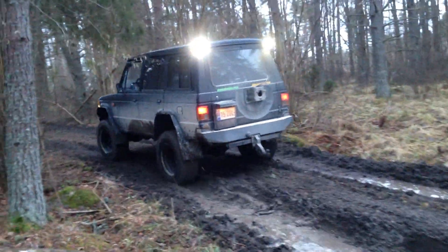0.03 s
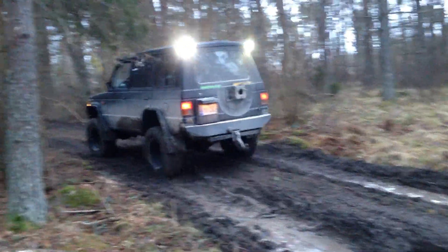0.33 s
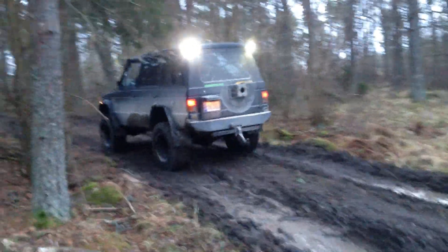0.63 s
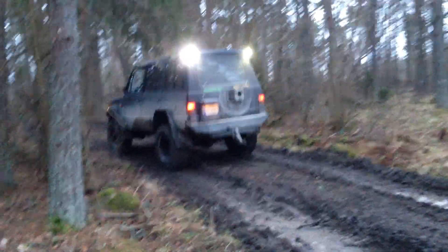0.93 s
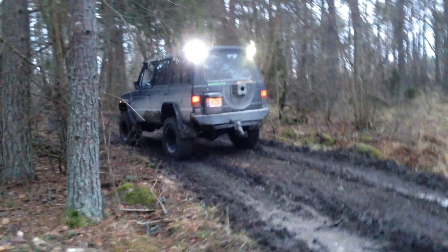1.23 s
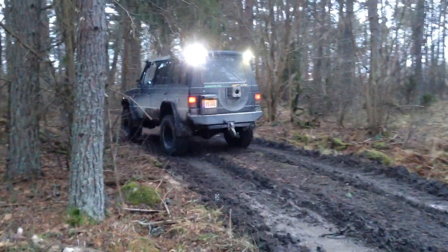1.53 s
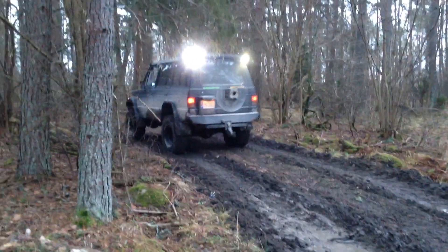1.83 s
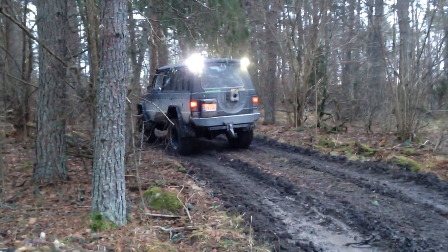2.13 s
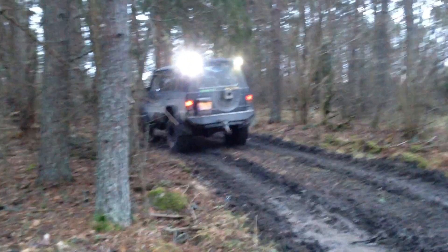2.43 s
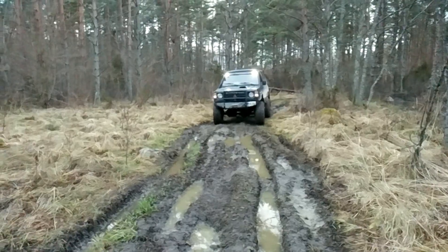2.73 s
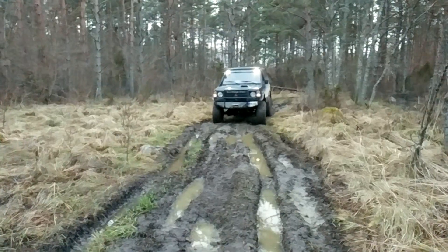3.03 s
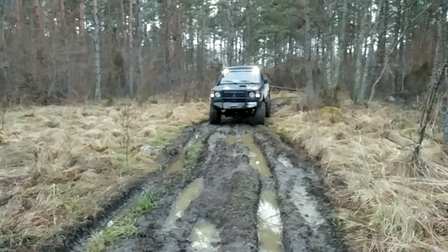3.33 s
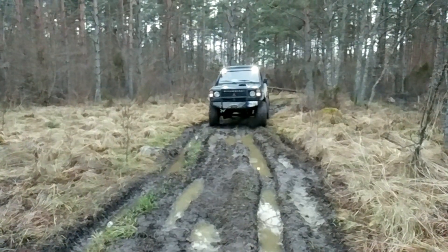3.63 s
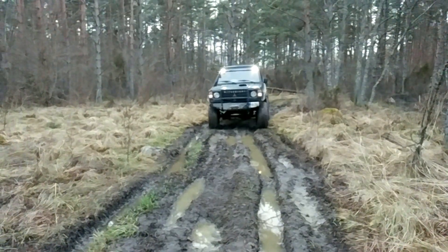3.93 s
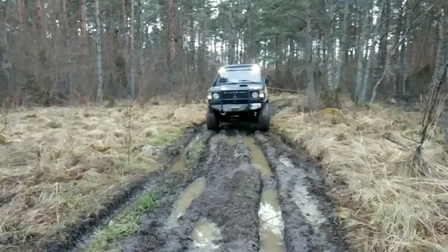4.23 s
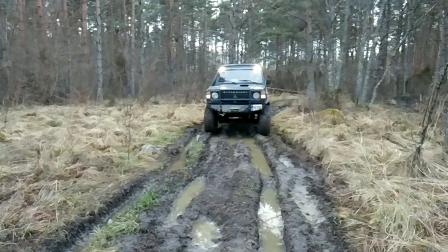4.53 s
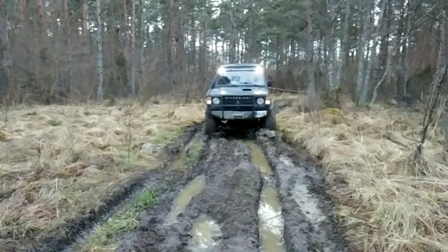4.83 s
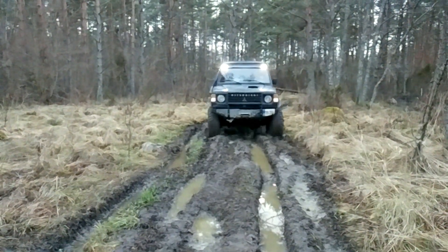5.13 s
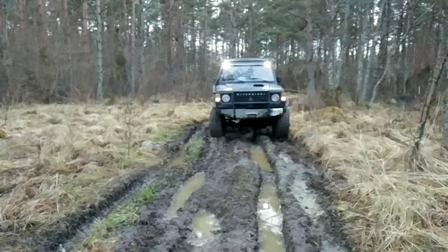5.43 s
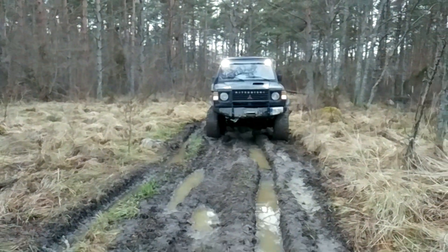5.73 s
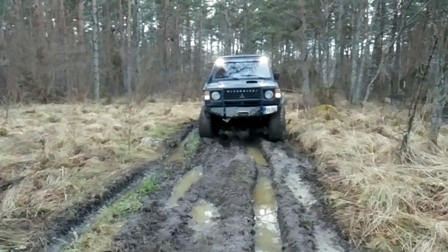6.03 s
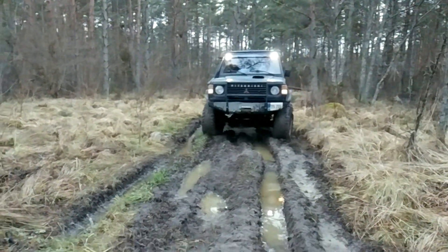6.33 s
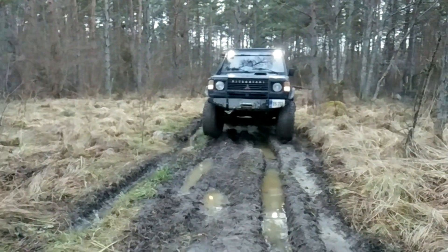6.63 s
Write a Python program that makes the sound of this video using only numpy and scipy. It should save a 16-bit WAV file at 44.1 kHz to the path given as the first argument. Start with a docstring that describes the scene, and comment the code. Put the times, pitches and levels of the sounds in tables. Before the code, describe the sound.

An off-road vehicle pulls away at walking pace a few metres from the microphone, its engine hum dropping and fading over wet mud and cracking twigs. After an abrupt, short silence, a diesel engine comes in from a distance and slowly approaches, its revs rising slightly, with a low exhaust drone, rhythmic clatter and intake hiss. Faint forest air lies behind both vehicles.

```python
"""A muddy forest track. Five metres from the microphone a four-wheel drive rolls away at walking pace,
its revs sinking while the tyres squelch, snap twigs and knock on stones. Half a second of silence follows.
Then a four-cylinder diesel fades in twenty metres off and crawls up to about twelve: the exhaust drones,
every firing knocks the block, the injectors tick and the intake hisses.
The trees scatter both cars a little, and faint distant air lies behind each."""
import sys
import numpy as np
from scipy import signal
from scipy.fft import rfft, irfft
from scipy.io import wavfile
from scipy.ndimage import uniform_filter1d

SR = 44100
rng = np.random.default_rng(int(sys.argv[2]) if len(sys.argv) > 2 else 0)


def generate_wav(sig):
    """Save sig (samples, or channels by samples) to the path in sys.argv[1] as 16-bit PCM at SR."""
    pcm = np.round(np.clip(np.atleast_2d(sig).T, -1, 1) * 32767).astype(np.int16)
    wavfile.write(sys.argv[1], SR, pcm)


N = 298998
T = np.arange(N) / SR
FREQS = np.maximum(np.fft.rfftfreq(8192, 1 / SR), 1)
LEAVE_END_S, DIESEL_START_S = 2.528, 3.055

# The leaving car's firing rate: t/s, f/Hz
LEAVE_FIRING_RATE = [(0.0, 78.8), (0.54, 73.6), (0.71, 70.43), (0.93, 63.08), (1.25, 57.6), (1.64, 55.27),
                     (2.19, 47.15), (2.5, 42.94)]
# its exhaust hum, a row per multiple of the firing rate: starting level/dB, rise/dB per octave of revs
LEAVE_HUM = [(-42.2, 18), (-48, 9), (-59, -7)]
# its gear tones: multiple of the firing rate, level/dB against the clatter
LEAVE_GEAR_TONES = [(2.25, -26), (2.5, -33), (2.75, -35.5), (5.5, -21.5), (7, -36), (10.25, -25.5),
                    (11, -25)]
# spectra of its exhaust pipe, its block and the mud: f/Hz, level/dB
LEAVE_PIPE_SPECTRUM = [(25, -22), (55, -3.5), (90, -6.5), (125, -5), (180, 2), (245, -3), (320, -14),
                       (500, -29.5)]
LEAVE_BLOCK_SPECTRUM = [(190, -50.5), (320, -29.5), (366, -5), (404, 1), (433, -1.5), (495, -2),
                        (592, -2.5), (721, -3), (1050, -3.5), (1360, -2.5), (1470, 0), (1810, -3.5),
                        (2010, 0), (2450, -8.5), (2700, -12), (3510, -30.5), (5940, -120)]
MUD_SPECTRUM = [(1470, -26.5), (2500, -7.5), (2800, -3), (3120, 2), (4170, 0.5), (5750, -4.5), (6640, -5.5),
                (13700, -16.5), (14700, -18), (15500, -20.5)]
# its ringing panels: f/Hz, width/Hz, boost/dB
LEAVE_PANEL_MODES = [(335, 40, 1.5), (411, 22, -1.5), (495.5, 21, 6.5), (733, 42, 6.5), (1600, 70, 3.5),
                     (2210, 60, 3.5)]
# a tyre churns through a wetter patch: t/s, length/s, swell/dB
WET_PATCHES = [(0.86, 0.1, 3), (1.14, 0.12, 3.5), (1.42, 0.11, 2), (2.32, 0.14, 3)]
# twigs, then stones and roots, under the tyres: t/s, peak level/dB, f/Hz
TWIG_SNAPS = [(0.0144, -16.5, 3300), (0.0274, -30.5, 4650), (0.0377, -34.5, 4030), (0.172, -27.5, 4000),
              (0.2069, -26.5, 4100), (0.5227, -30, 3390), (0.5432, -27.5, 3590), (0.6301, -27, 4120),
              (0.6873, -26, 3370), (0.8061, -35, 3680), (0.8754, -27, 4290), (0.9549, -22.5, 4580),
              (1.1114, -30, 3710), (1.1469, -29, 3713), (1.5542, -33, 3040)]
STONE_KNOCKS = [(0.178, -25, 1410), (0.476, -28.5, 1490), (0.773, -27, 1480)]

# The diesel's firing rate: t/s, f/Hz
DIESEL_FIRING_RATE = [(3.06, 42.3), (3.55, 44.84), (3.77, 47.14), (4.22, 47.41), (4.52, 49.75),
                      (4.69, 51.22), (5.04, 53.5), (5.17, 52.69), (5.6, 52.76), (5.85, 51.97),
                      (6.25, 52.06), (6.78, 53.9)]
# its exhaust hum, a row per multiple of the firing rate: starting level/dB, rise/dB per octave of revs
DIESEL_HUM = [(-55.5, 25), (-34, -6.5), (-41.5, 2.5)]
# its tones: multiple of the firing rate, level/dB against the clatter
DIESEL_TONES = [(3.5, -28), (3.75, -30.5), (4, -27.5), (4.25, -34.5), (7, -30.5), (9, -30.5), (10, -28),
                (11, -28), (14, -31), (15, -33), (16, -30), (18, -31)]
# spectra of its exhaust pipe, block, injectors and intake: f/Hz, level/dB
DIESEL_PIPE_SPECTRUM = [(25, -27), (45, -25), (65, -4.5), (110, -2.5), (160, -1), (215, 4), (260, -1.5),
                        (320, -0.5), (420, -17), (700, -44)]
DIESEL_BLOCK_SPECTRUM = [(290, -20), (355, -3.5), (420, -5.5), (520, -4.5), (565, -7.5), (660, -4.5),
                         (760, -1), (940, -2.5), (1030, -8.5), (1220, -6.5), (1430, -14), (1620, -10.5),
                         (1760, -17.5), (1950, -12), (2200, -29)]
INJECTOR_SPECTRUM = [(1240, -41), (2100, -15), (2230, -8.5), (2690, -1), (3140, 0), (3770, -3.5),
                     (4400, -11.5), (5000, -8.5), (6500, -23), (11000, -120)]
INTAKE_SPECTRUM = [(2710, -33), (4600, -16), (5410, -10), (6740, 0), (7130, 1), (7620, -3), (8350, -16),
                   (9060, -27.5), (11700, -17.5), (12800, -20.5), (14000, -26), (15500, -22.5)]
# its ringing panels: f/Hz, width/Hz, boost/dB
DIESEL_PANEL_MODES = [(374.2, 13, 6), (476.5, 16, 2.5), (751, 40, 3), (834, 16, 2), (1553, 78, 3.5)]
# its tappet and mounts: place in the cycle/firings, f/Hz, Q, level/dB against the knock
LOOSE_PARTS = [(1.57, 1607, 10, -16.5), (1.75, 361, 14, -18), (3.75, 370, 5.4, -19)]
# it pulls harder over a rut: t/s, length/s, hiss swell/dB, knock swell/dB, hum swell/dB
RUT_PULLS = [(3.35, 0.14, 1, 1.8, 1), (4.76, 0.23, 1.7, 0.7, 0.3), (5.25, 0.28, 3.5, -0.1, 0.3),
             (6.38, 0.2, 1.2, 2.0, 0.3), (6.6, 0.16, 0.3, 0.6, 3)]

# Each cylinder's firing, in both engines: level/dB
CYLINDER_DB = [0.34, 0.55, -1, -0.11]
# distant air in the trees: f/Hz, level/dB
AIR_SPECTRUM = [(20, -5), (50, -3.5), (120, 0), (300, -13), (1000, -15.5), (4000, -20.5), (12000, -37.5)]


def coming_diesel(from_m=19.7, speed_m_s=2.08):
    """The diesel crawls towards the microphone; knock, tick and hiss all pulse with its firings."""
    hz, octaves, firings = revs(DIESEL_FIRING_RATE)
    driven_m = speed_m_s * np.maximum(T - DIESEL_START_S, 0)
    nearness = from_m / (from_m - driven_m)
    pull_hiss_db, pull_knock_db, pull_hum_db = swells(RUT_PULLS)
    tones = whine(firings, DIESEL_TONES, waver_db=2.5)

    hum_db = hum_levels(hz, DIESEL_HUM, silencer_hz=157, width_hz=6.4, boom_db=3)
    hum = exhaust_hum(firings, hum_db, waver_db=0.75) * undb(pull_hum_db)
    pulses = clatter(firings, jitter_ms=0.27, valves_db=10, rattle_db=-0.5, ring_s=0.024)
    rumble = colour(pulses + tones, DIESEL_PIPE_SPECTRUM) * undb(-36.5 - 12.5 * octaves)

    works = clatter(firings, jitter_ms=0.1, valves_db=9, rattle_db=3.5, ring_s=0.1)
    knock = colour(works + tones, DIESEL_BLOCK_SPECTRUM, DIESEL_PANEL_MODES) + taps(firings)
    knock = grille(knock, driven_m) * undb(-31.5 + 7.5 * octaves + pull_knock_db)

    tick = colour(puffs(firings, peak_at=0.39, steady=2.2, scatter_db=3.5), INJECTOR_SPECTRUM)
    tick *= undb(-44 + 10 * octaves + 0.7 * pull_hiss_db)
    hiss = colour(puffs(firings, peak_at=0.26, steady=1, scatter_db=1.75), INTAKE_SPECTRUM)
    hiss *= undb(-41.5 + 12.5 * octaves + pull_hiss_db)
    return nearness * (hum + rumble + knock + tick + hiss)


def leaving_car(from_m=4.96, speed_m_s=1.8):
    """The car starts close to the microphone and rolls off through mud and twigs as its revs sink."""
    hz, octaves, firings = revs(LEAVE_FIRING_RATE)
    nearness = from_m / (from_m + speed_m_s * T)
    tones = whine(firings, LEAVE_GEAR_TONES, waver_db=3)
    squelch = wet_clicks(per_s=700, spread_db=3.5)

    hum_db = hum_levels(hz, LEAVE_HUM, silencer_hz=170, width_hz=16, boom_db=12.5)
    hum = exhaust_hum(firings, hum_db, waver_db=1.25)
    pulses = clatter(firings, jitter_ms=0.16, valves_db=14.5, rattle_db=-0.5, ring_s=0.05)
    rumble = colour(pulses + tones, LEAVE_PIPE_SPECTRUM) * undb(-49.5 + 2.5 * octaves)

    works = clatter(firings, jitter_ms=0.12, valves_db=7, rattle_db=1.5, ring_s=0.073)
    block = colour(works + tones + 0.37 * squelch, LEAVE_BLOCK_SPECTRUM, LEAVE_PANEL_MODES)
    block *= undb(-41.5 + 7 * octaves)

    mud = tyre_mud(squelch) * undb(-41 + 9.5 * octaves)
    debris = cracks(TWIG_SNAPS, t60=0.02, q=1.9) + cracks(STONE_KNOCKS, t60=0.028, q=1.8)
    return nearness * (hum + rumble + block + mud) + debris


def revs(table):
    """An engine's firing rate in Hz, its octaves above the starting rate, and the firings so far."""
    hz = np.interp(T, *np.transpose(table))
    return hz, np.log2(hz / hz[0]), np.cumsum(hz) / SR


def exhaust_hum(firings, levels_db, waver_db):
    """The lowest multiples of the firing rate, as the silencer lets them out."""
    return sum(tone(db + waver_db * walk(22), k * firings + rng.random())
               for k, db in enumerate(levels_db, 1))


def hum_levels(hz, orders, silencer_hz, width_hz, boom_db):
    """Each multiple's level in dB follows the revs and booms in the silencer's resonance."""
    return [db + per_octave * np.log2(hz / hz[0]) + resonance_db(k * hz, silencer_hz, width_hz, boom_db)
            for k, (db, per_octave) in enumerate(orders, 1)]


def clatter(firings, jitter_ms, valves_db, rattle_db, ring_s, count=24):
    """Combustion knocks with valves and gears striking between them, in the same pattern every cycle."""
    knocks = strikes(firings, np.arange(4), undb(CYLINDER_DB), jitter_ms, scatter_db=0)
    places = 4 * (np.arange(count) + rng.random(count)) / count
    valves = strikes(firings, places, rng.choice([-1, 1], count), jitter_ms, scatter_db=2)
    blows = knocks + undb(valves_db) * valves
    return unit(unit(blows) + undb(rattle_db) * rattle(blows, ring_s))


def strikes(firings, places, sizes, jitter_ms, scatter_db):
    """Blows at set places in the four-firing cycle, each a little off in time and strength."""
    cycle_starts = 4 * np.arange(int(firings[-1] / 4) + 1)
    points = (cycle_starts[:, None] + places).ravel()
    timing, strength = rng.standard_normal((len(points), 2)).T
    at = (np.interp(points, firings, T, right=-1) + jitter_ms * timing / 1000) * SR
    size = np.resize(sizes, len(points)) * undb(scatter_db * strength)
    inside = (at > 0) & (at < N - 1)
    return unit(np.bincount(at[inside].astype(int), size[inside], N))


def rattle(blows, t60):
    """Each blow shakes many loose parts: a fresh burst of noise that dies away."""
    decay = np.exp(-2 * np.log(1000) / (t60 * SR))
    energy = signal.lfilter([1], [1, -decay], blows ** 2 + 1e-12)
    return unit(np.sqrt(energy) * rng.standard_normal(N))


def grille(knock, driven_m, db_per_m=0.88):
    """The grille beams the middle of the knock forwards as it comes to face the microphone."""
    facing_db = -4.5 + db_per_m * driven_m
    beamed = knock + (undb(facing_db) - 1) * band(knock, hz=770, q=2.2)
    return beamed / undb(0.25 * facing_db)


def puffs(firings, peak_at, steady, scatter_db):
    """Noise that swells after each firing, peaks at the given share of the period and sinks again."""
    k = firings.astype(int)
    phase = firings % 1 / peak_at
    size = undb(np.take(CYLINDER_DB, k, mode="wrap") + scatter_db * rng.standard_normal(k[-1] + 1)[k])
    return unit(rng.standard_normal(N) * (steady + size * phase * np.exp(1 - phase)))


def taps(firings, ring_s=0.025):
    """A loose tappet and the mounts knock at their own points of the cycle, each with its own pitch."""
    out = 0
    for place, hz, q, db in LOOSE_PARTS:
        blows = strikes(firings, np.array([place]), [1], jitter_ms=0.27, scatter_db=0.5)
        ring = band(blows + 0.29 * rattle(blows, ring_s), hz, q)
        out += undb(db) * unit(band(ring, hz, q=2.1))
    return out


def whine(firings, tones, waver_db, slip_cycles=0.075):
    """Tones locked to the engine, unsteady in strength and phase, on average waver_db below their level."""
    return sum(tone(db + waver_db * (walk(9) - 1), k * firings + slip_cycles * walk(12))
               for k, db in tones)


def tyre_mud(squelch):
    """Mud sticks to the tyres and tears loose, louder in the wetter patches."""
    churn_db, = swells(WET_PATCHES)
    tearing = 0.52 * squelch + 0.59 * rattle(squelch, t60=0.011) + 0.87 * rng.standard_normal(N)
    return colour(tearing, MUD_SPECTRUM) * undb(churn_db + 0.6 * walk(28))


def wet_clicks(per_s, spread_db):
    """Tiny clicks in the mud, most faint and a few strong."""
    hit = rng.random(N) < per_s / SR
    clicks = hit * rng.uniform(-1, 1, N)
    return unit(clicks * undb(spread_db * np.minimum(rng.exponential(size=N), 3.5)))


def cracks(table, t60, q):
    """A tyre meets a twig, stone or root: a sharp crack and a short ring."""
    out, t = np.zeros(N), T[:SR // 16]
    for s, db, hz in table:
        burst = 0.31 * rng.standard_normal(len(t)) * np.exp(-np.log(1000) * t / t60)
        burst[0] += 3.5
        crack = band(band(burst, hz, q), hz, q / 2)
        out[int(s * SR):][:len(t)] += undb(db) * crack / np.abs(crack).max()
    return out


def forest(x, wet_db=-16, t60=0.63):
    """Trunks scatter a faint, short echo back to the microphone; the long waves pass around them."""
    t = T[:SR // 2]
    echoes = rng.standard_normal(len(t)) * np.exp(-np.log(1000) * t / t60)
    scattered = signal.oaconvolve(band(x, hz=2600, q=0.45), echoes / np.linalg.norm(echoes))[:N]
    return x + undb(wet_db) * scattered


def distant_air(level_db=-66):
    """Air in the trees far from the track: a low, steady rush."""
    return undb(level_db) * colour(rng.standard_normal(N), AIR_SPECTRUM)


def colour(x, spectrum, peaks=()):
    """Causal filter from (f/Hz, level/dB) points and (f/Hz, width/Hz, boost/dB) resonances; rms 1 out."""
    hz, db = np.transpose(spectrum)
    db = np.interp(np.log(FREQS), np.log(hz), db)
    octaves_outside = np.maximum(np.log2(hz[0] / FREQS), 0) + np.maximum(np.log2(FREQS / hz[-1]), 0)
    db -= np.minimum(40 * octaves_outside, 60)
    db += sum(resonance_db(FREQS, *peak) for peak in peaks)
    # folding the cepstrum gives minimum phase
    cepstrum = irfft(np.log(undb(db)))
    cepstrum[1:len(FREQS) - 1] *= 2
    cepstrum[len(FREQS):] = 0
    impulse = irfft(np.exp(rfft(cepstrum)))
    return unit(signal.oaconvolve(x, impulse)[:N])


def resonance_db(hz, centre_hz, width_hz, boost_db):
    """The bell-shaped boost of one resonance."""
    return boost_db / (1 + (2 * (hz - centre_hz) / width_hz) ** 2)


def band(x, hz, q):
    """Two-pole resonance, gain 1 at the centre."""
    return signal.lfilter(*signal.iirpeak(hz, q, fs=SR), x)


def tone(db, cycles):
    """A sine at the given rms level."""
    return np.sqrt(2) * undb(db) * np.sin(2 * np.pi * cycles)


def swells(table):
    """A smooth rise and fall for each (t/s, length/s, swell/dB, ..) row; one curve per dB column."""
    return sum(np.outer(db, np.exp(-(2 * (T - s) / length) ** 2)) for s, length, *db in table)


def walk(rate_hz):
    """Smooth random drift, rms 1."""
    hold = int(SR / rate_hz)
    steps = np.repeat(rng.standard_normal(N // hold + 1), hold)
    return unit(uniform_filter1d(steps, hold)[:N])


def undb(db):
    """Decibels to gain."""
    return 10 ** (np.asarray(db) / 20)


def unit(x):
    """Scale to rms 1."""
    return x / np.sqrt(np.mean(x ** 2))


def scene(fade_in_s=0.27, fade_from_db=-19.5):
    """One microphone by the track: a car leaves, a silent pause, then the diesel fades in."""
    cut_off = uniform_filter1d(1. * (T < LEAVE_END_S), size=128)
    fade_in = np.interp(T, [DIESEL_START_S, DIESEL_START_S + fade_in_s], [undb(fade_from_db), 1], left=0)
    air = distant_air()
    leaving = cut_off * (forest(leaving_car()) + air)
    coming = fade_in * (forest(coming_diesel()) + air)
    return (leaving + coming)[None]


def record(dry):
    """The camera's microphone cuts the top of the treble."""
    top_hz = 15650
    return signal.sosfilt(signal.ellip(10, 0.1, 80, top_hz, fs=SR, output="sos"), dry)


dry = scene()
out = record(dry)
generate_wav(out)
```